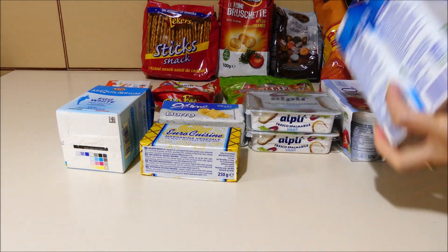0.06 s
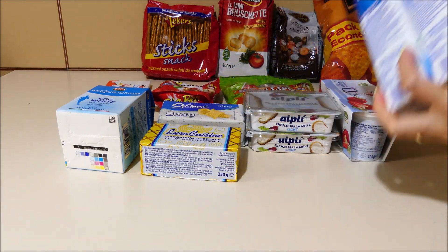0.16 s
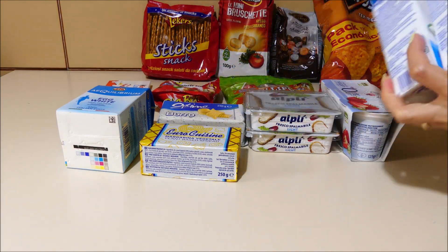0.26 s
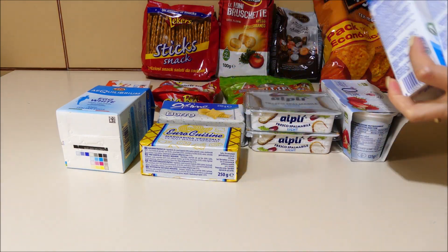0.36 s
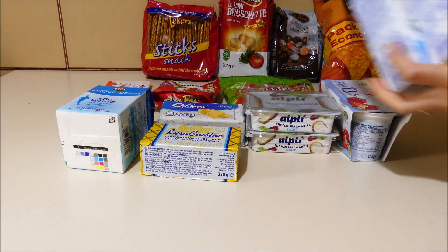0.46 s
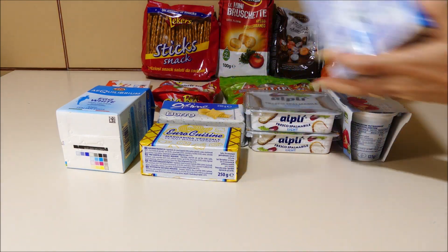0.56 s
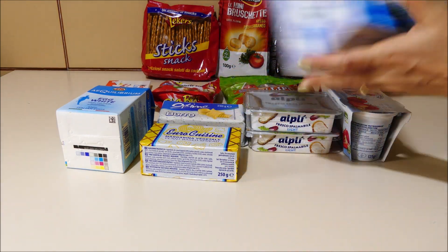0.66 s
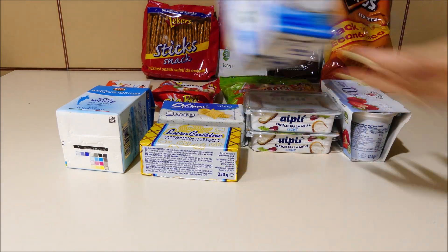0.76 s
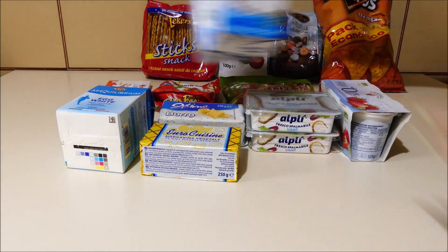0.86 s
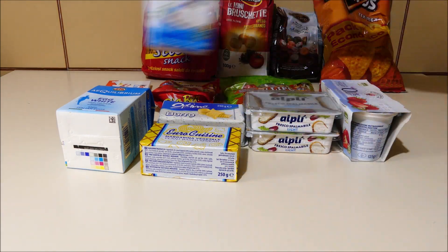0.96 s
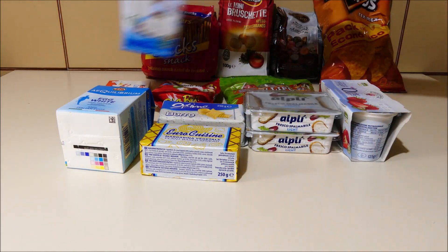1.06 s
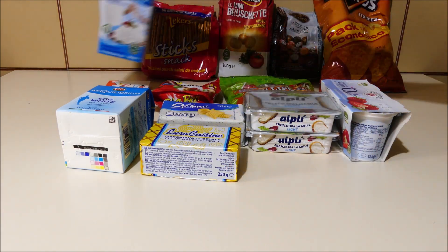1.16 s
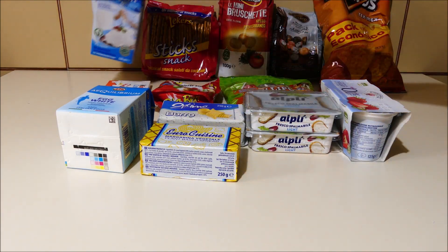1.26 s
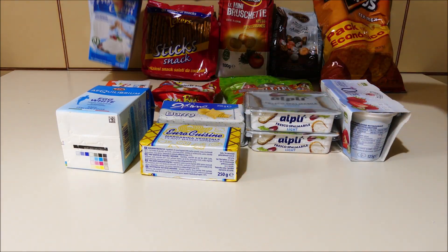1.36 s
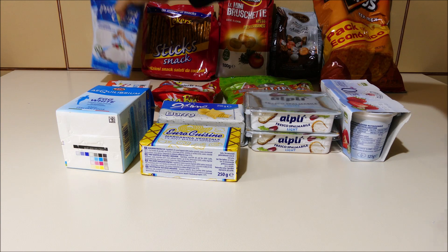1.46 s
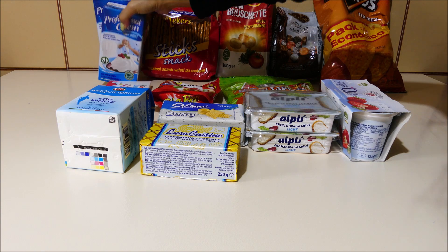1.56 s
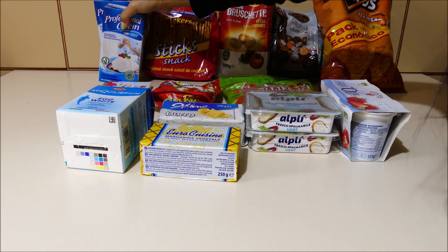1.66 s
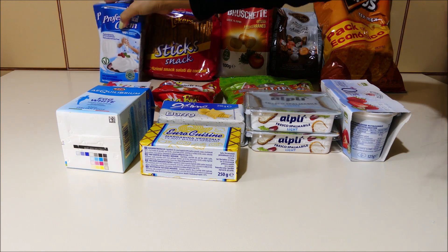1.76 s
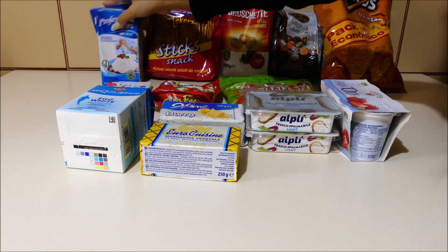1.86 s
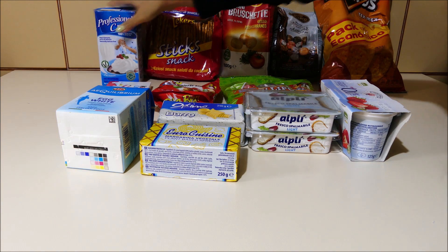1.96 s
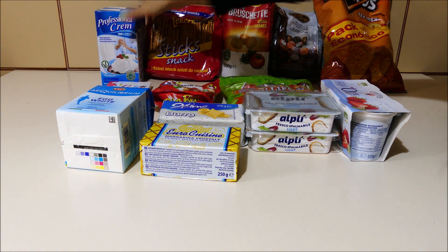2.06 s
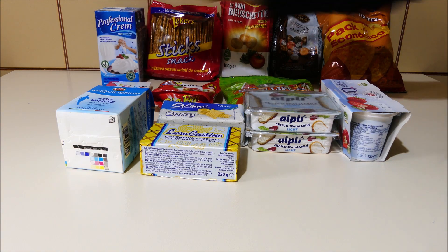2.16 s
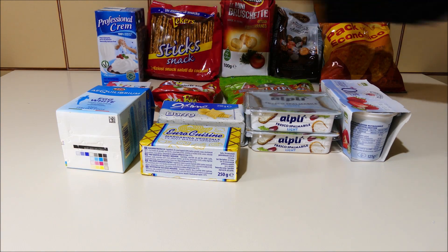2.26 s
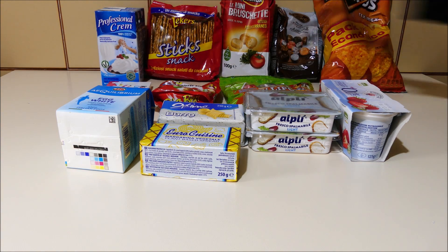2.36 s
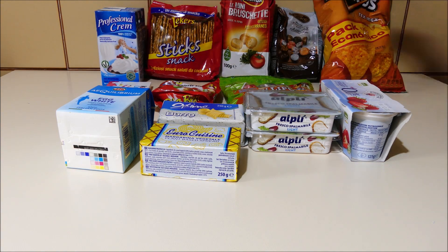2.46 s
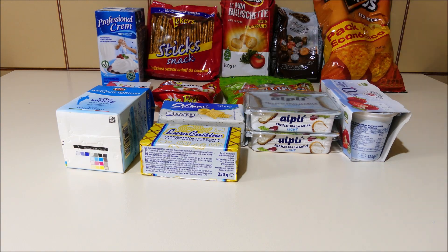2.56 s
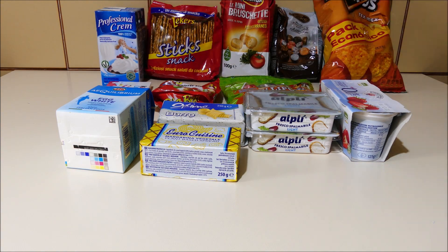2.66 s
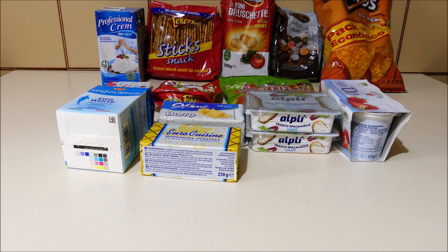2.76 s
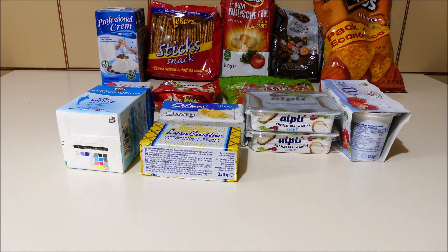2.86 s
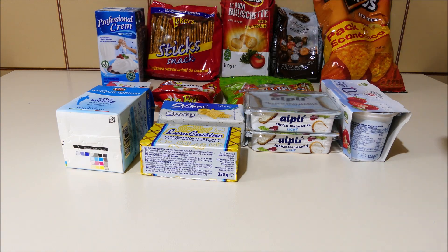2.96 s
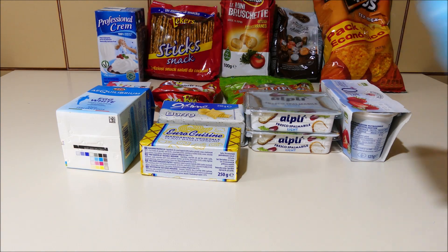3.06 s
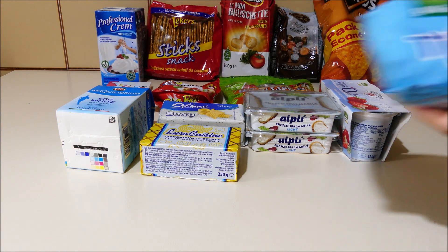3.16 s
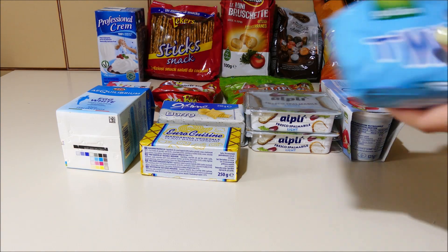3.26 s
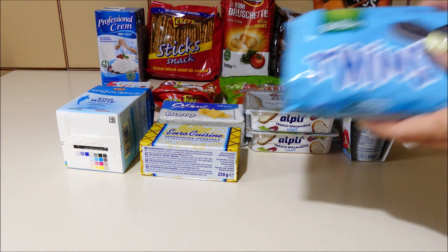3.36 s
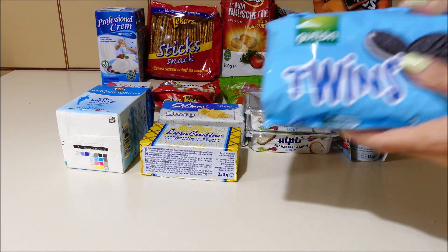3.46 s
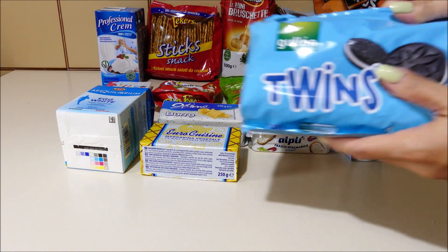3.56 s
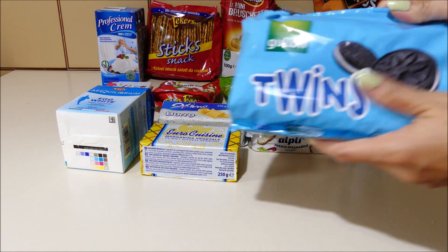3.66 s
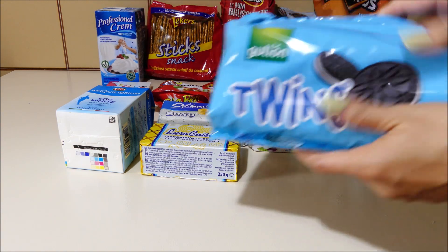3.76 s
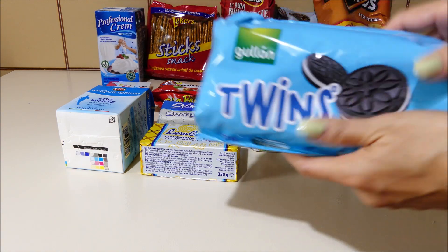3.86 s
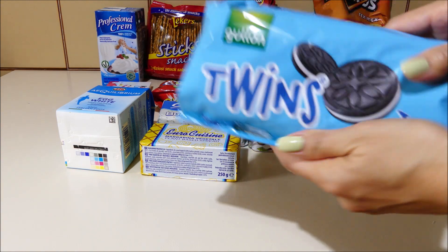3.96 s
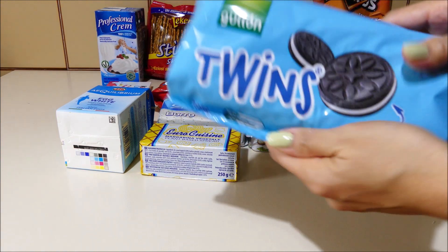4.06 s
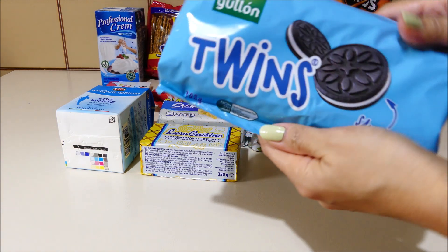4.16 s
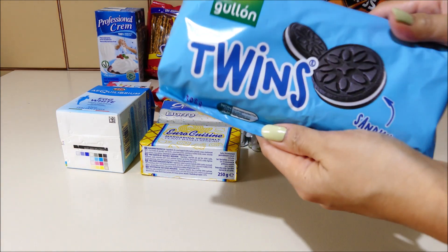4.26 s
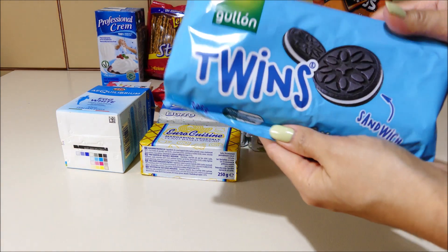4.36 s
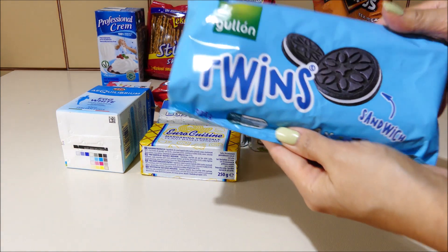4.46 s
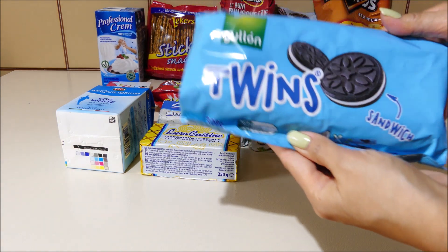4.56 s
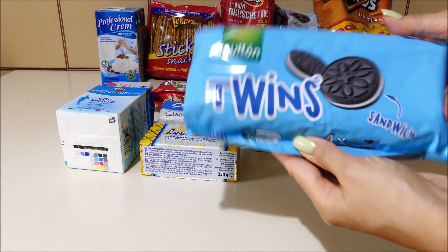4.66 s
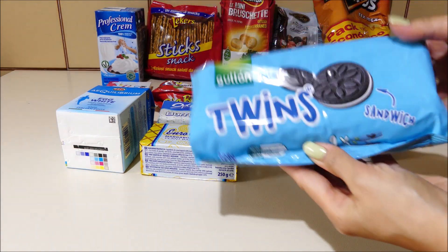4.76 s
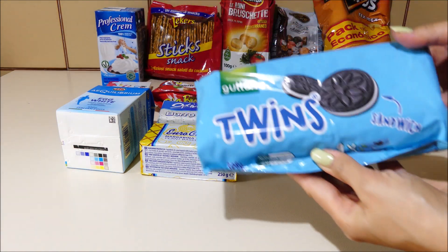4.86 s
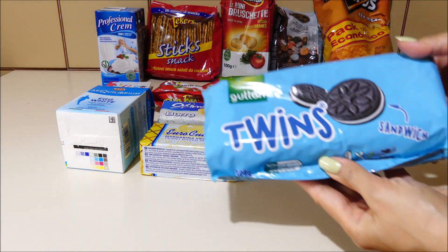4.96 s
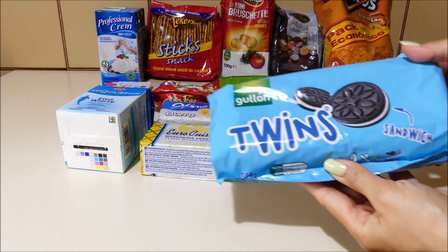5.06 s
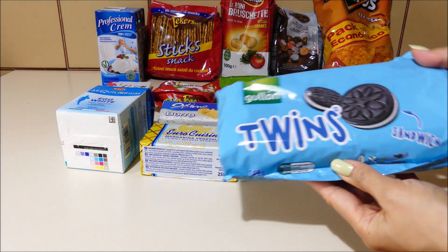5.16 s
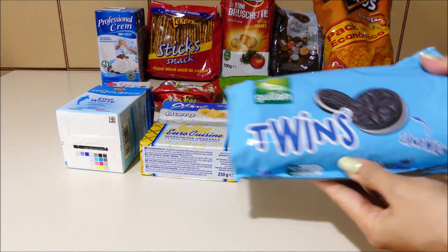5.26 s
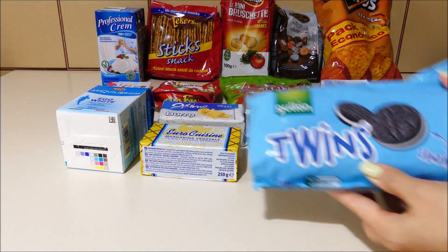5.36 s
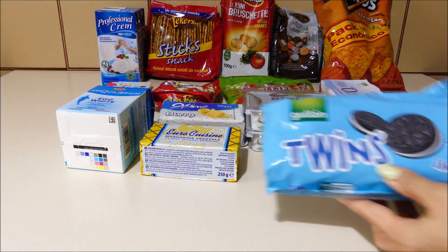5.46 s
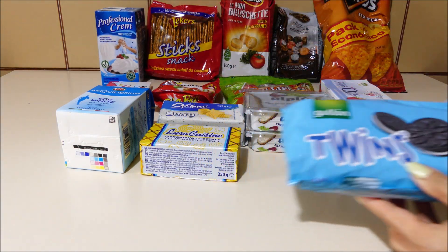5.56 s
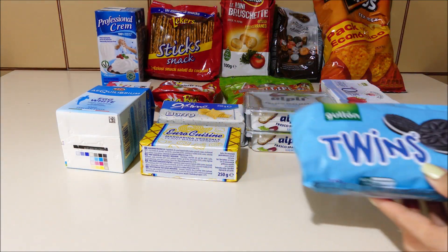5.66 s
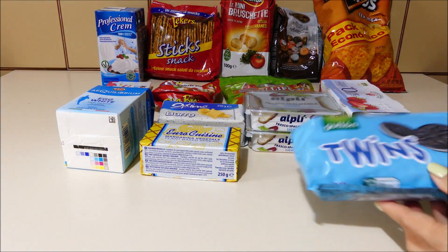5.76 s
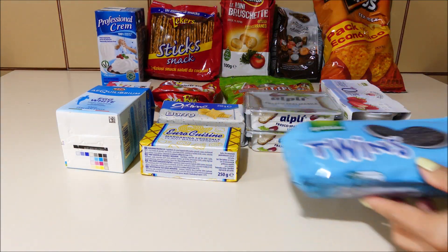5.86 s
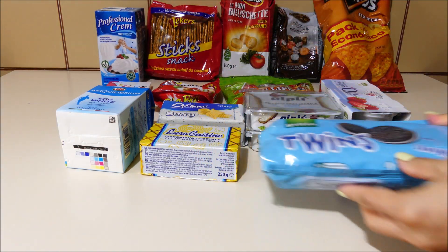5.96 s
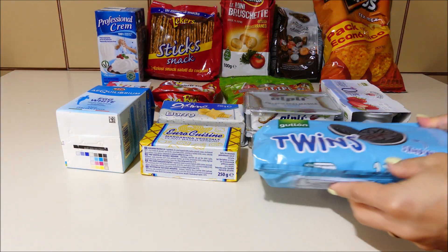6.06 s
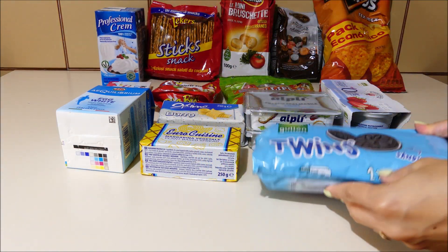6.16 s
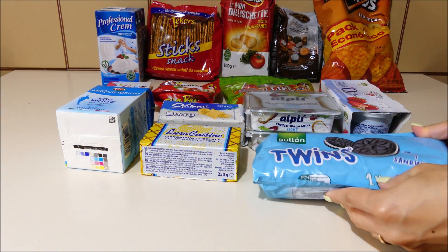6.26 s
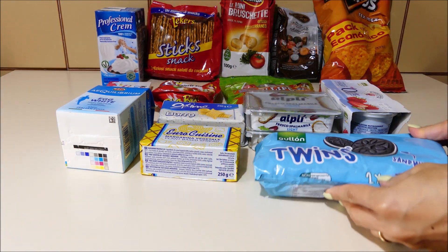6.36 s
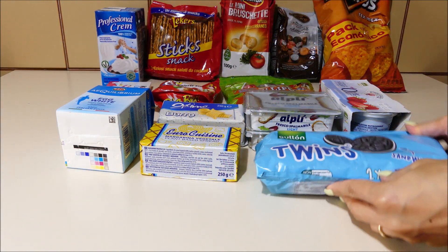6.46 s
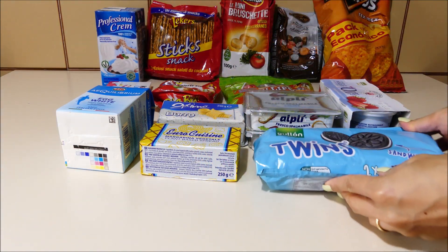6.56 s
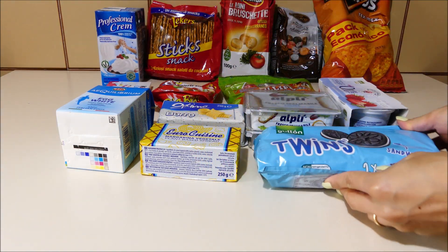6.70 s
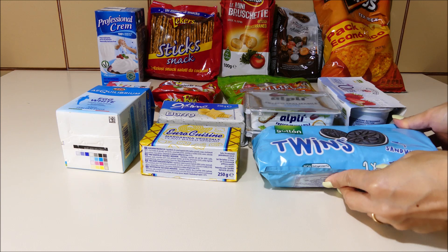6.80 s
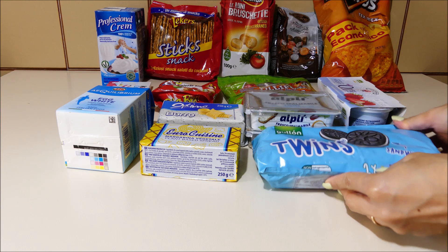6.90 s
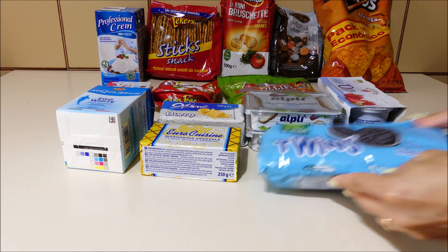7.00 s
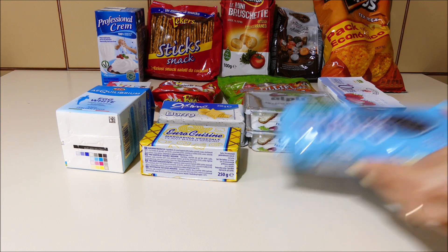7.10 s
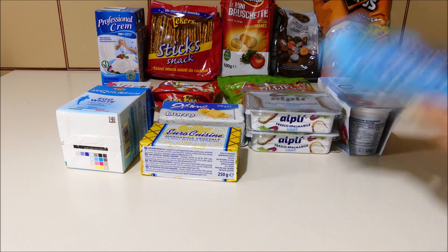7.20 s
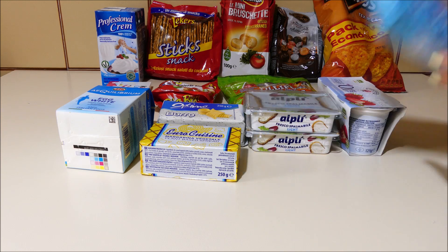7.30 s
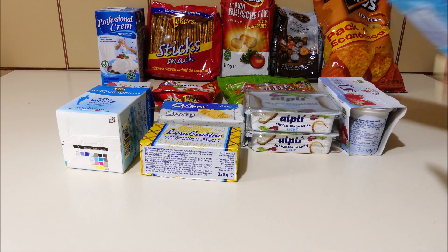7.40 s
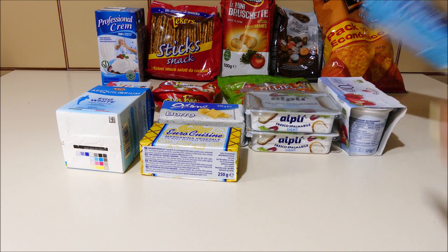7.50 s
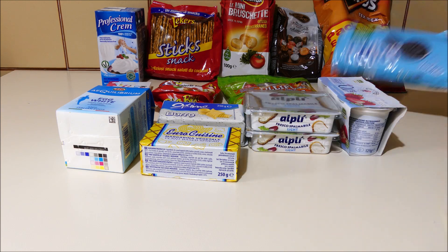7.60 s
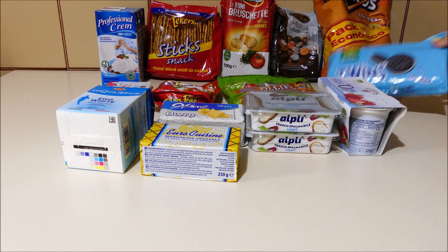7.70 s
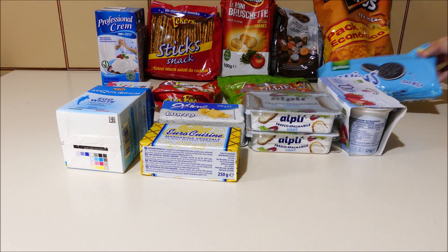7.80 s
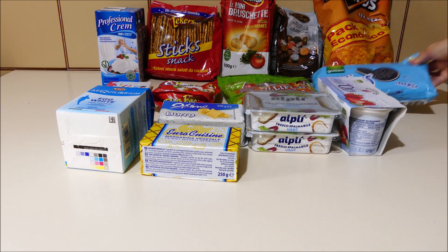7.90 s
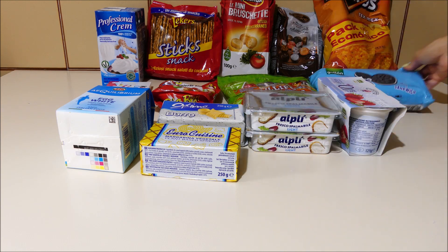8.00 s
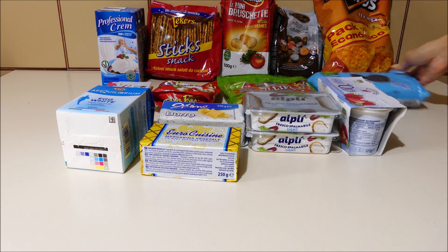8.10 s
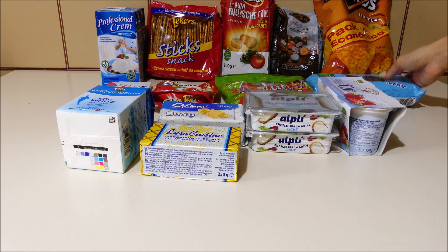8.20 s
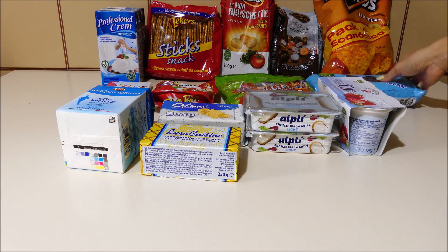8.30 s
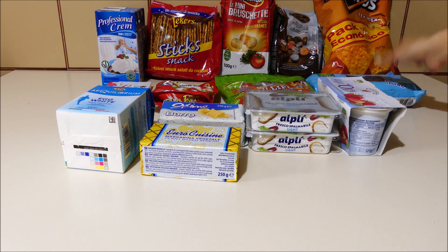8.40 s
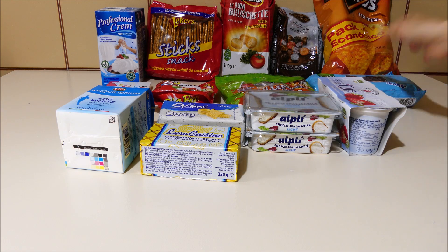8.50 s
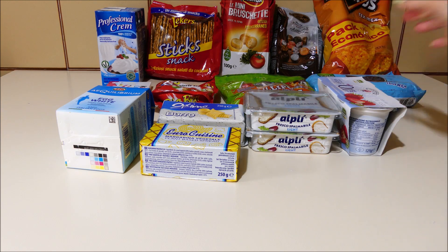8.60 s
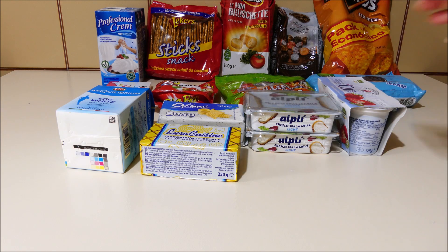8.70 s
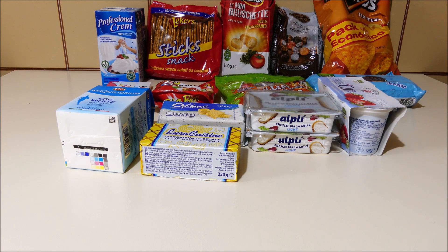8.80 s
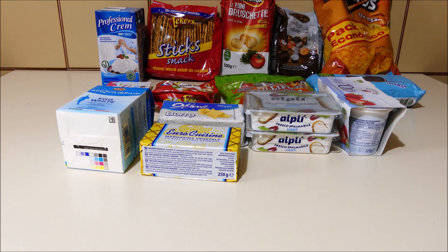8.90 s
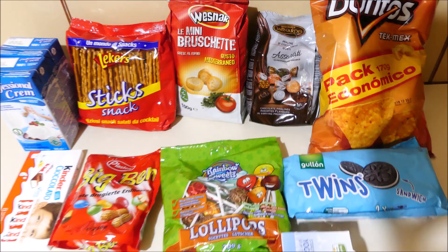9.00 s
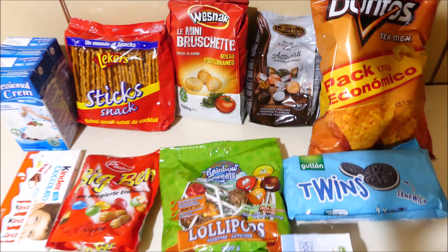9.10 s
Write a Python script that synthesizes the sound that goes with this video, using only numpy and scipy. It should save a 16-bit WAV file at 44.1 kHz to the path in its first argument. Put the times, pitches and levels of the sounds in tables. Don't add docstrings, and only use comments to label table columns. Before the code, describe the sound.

A small, hard-surfaced kitchen heard through a close microphone, with a low steady appliance hum and light hiss throughout. The first second is nearly quiet, with only barely audible brushes. From about 1.2 to 2 seconds a carton is set down with several soft, dull knocks and short papery scrapes, then it is quiet again. At about 2.8 seconds a plastic film pack is picked up; crackling swells quickly and is densest around 3.1 to 4.3, bright sharp snaps over fine crackle. From 4.5 to 5.7 it is tilted, with more separated creases and small squeezes. Near 6.2 it meets the table with a soft thud, crinkling on. It is lifted around 6.8 to 7.2, a finger stutters briefly over taut film near 7.5, and the pack is pushed among bags with a light bump at 8. Sparse last creases fade by 8.6; sound stops abruptly just after 9.

```python
import sys
import numpy as np
from scipy import signal
from scipy.fft import rfft, irfft, next_fast_len
from scipy.io import wavfile
from scipy.ndimage import uniform_filter1d, map_coordinates

SR = 44100
rng = np.random.default_rng(int(sys.argv[2]) if len(sys.argv) > 2 else 0)


def elevation(decibels):
    levels = np.asarray(decibels, float)
    return 10 ** (levels / 20)


def materialize(psi):
    bounded = np.clip(np.atleast_2d(psi).T, -1, 1)
    quanta = np.round(bounded * 32767).astype(np.int16)
    wavfile.write(sys.argv[1], SR, quanta)


N = 403074

# start_s, crack_db, ring_hz
# (facet), sizzle_db, hollow_db (both over crack)
CREASES = [(0.2055, -45, 2230, -7, -17.5), (0.2228, -43, 3540, -21, -8), (0.3685, -55, 2230.0, -12, -10),
           (0.4122, -54, 8470.0, -7.0, -1), (1.2358, -30, 4460, -9, -5), (1.2526, -41, 1440, -28, 13.5),
           (1.478, -38, 2030.0, -2, 15), (1.6448, -34.5, 1510, -4.5, 2), (1.6634, -18, 1620, -17, -4.5),
           (1.9119, -28.5, 4000, -7, 0), (1.9637, -26, 2450, -14, -3.5), (2.686, -54, 2380, -13.0, 11.5),
           (2.783, -42.5, 1500.0, -16, -1), (2.7988, -33, 1840, -13, -5.5), (2.811, -38.5, 2420, -4, -5),
          (3.007, -29.5, 1650, -15.5, -16), (3.105, -27, 1970, -20.5, -6), (3.114, -20.5, 3800, -3.5, -9.5),
          (3.1595, -21.5, 3330, -10, -11.5), (3.1845, -27, 4760.0, -14, -2),
          (3.2562, -29, 2980, -10.5, -0.5), (3.3272, -22.5, 2060, -12, -10), (3.3361, -18.5, 1570, -18, -6),
          (3.338, -18, 1530, -15, -5.5), (3.3414, -14.5, 6550, -15, -5.5), (3.3578, -21, 4760.0, -7, -11.5),
          (3.3674, -25.5, 3730.0, -6, -3), (3.4094, -27, 2720, -6, -6.5), (3.4354, -24.5, 1980, -15, -13),
          (3.532, -30.5, 8860, -19, -3), (3.543, -17, 6740, -10, -13),
           (3.5905, -25, 1750, -18, -5.5), (3.6538, -19, 8050, -24.5, -9), (3.684, -19.5, 3100, -18, -3),
         (3.7081, -26.5, 1520, -7, -3.0), (3.7402, -16.5, 6800, -18, -13), (3.749, -17.5, 5370, -3.5, -3.5),
         (3.7645, -15.5, 4420, -9, -14), (3.8671, -36, 2280, -13, 0), (3.8959, -24.5, 8300, -23, -5),
         (3.9422, -29.5, 2150, -14, -8), (3.9662, -32, 2290.0, -2.5, -5), (4.01, -25.5, 1560, -21.0, -1.5),
         (4.044, -29.5, 1500.0, -10, -6), (4.0604, -24, 2880, -18.0, -2), (4.0747, -28.5, 8700, -10, -3),
         (4.1354, -22.5, 2100, -25, -0.5), (4.1508, -30, 2750.0, -7, -4), (4.1845, -19.5, 4500, -7.5, -2.5),
         (4.274, -27.5, 2650, -17, -3.5), (4.2865, -23.5, 7240, -17, -3.5), (4.3237, -28.5, 2770, -19, -3),
           (4.4817, -22.5, 5950, -14, -14), (4.512, -29, 4540, -15, -4.5), (4.5697, -20, 8000, -17, -7.5),
          (4.5943, -21.5, 1470, -16, -2.5), (4.6224, -26, 1460, -16, 3), (4.6853, -27, 1580, -18, -5),
          (4.727, -29.0, 4740, -20, 1), (4.771, -30, 5260, -8.5, -11), (4.8578, -38, 1970, -26, -3),
          (4.9232, -28.5, 2150, -31, -7.5), (5.0012, -29, 7500, -4, -8), (5.0051, -28, 2010, -8, -7),
          (5.1053, -35, 3080, -12, -25), (5.1861, -21, 4060, -15.0, -5.5), (5.2164, -23, 1560, -19, -2),
          (5.2529, -23, 2590.0, -2, -3.5), (5.2693, -24.5, 3560, -16, -11.5), (5.343, -18, 7060, -20, -11),
          (5.3472, -21.5, 6800, -11, -17), (5.4464, -27, 4900, -5, -5), (5.5173, -29, 1970, -23, -6),
          (5.5924, -38, 4370, -7, -5), (5.645, -30.5, 1990, -18, 1.0),
           (5.7395, -23.5, 4340, -17, -7.5), (5.7905, -26.5, 9000.0, -11.5, -23),
        (5.801, -22.5, 7700, -20.5, -13.5), (5.8694, -26.5, 8900, -13, -7),
        (5.932, -38.5, 4090.0, -2.5, -8), (6.0088, -32, 7340, -13, -7), (6.017, -35, 1300, -21, 4.5),
        (6.0536, -30, 1530, -16, 0), (6.062, -32.5, 5170, -6, -4.5), (6.109, -30, 1500.0, -16.5, 0),
        (6.141, -28, 5000, -6.5, -7.5), (6.17, -18.5, 1890, -20, -6), (6.1744, -19, 2550, -14, 0),
        (6.1766, -21, 2580, -12, 4.5), (6.3955, -30, 2440.0, -24, -5), (6.4176, -24, 2500, -21, -1.5),
        (6.4286, -24, 1510, -23.0, -0.5), (6.436, -26, 6960, -18, -19), (6.4532, -25.5, 2570, -16.5, -7),
        (6.475, -26.5, 1500.0, -25, 3), (6.5259, -31.5, 3030, -12, 0.5), (6.5566, -26, 2100, -21, -0.5),
        (6.5933, -25, 6700, -28.5, -8),
           (6.726, -33.5, 1540, -25, -7), (6.7656, -25, 2180, -29, -14), (6.812, -25.5, 1580, -15, -5.5),
          (6.8818, -28, 8400, -18, -2), (6.9144, -23.5, 4260, -26, -4.5), (6.9692, -25, 2300, -8, -12),
          (6.9804, -20, 6900, -18, -3.5), (7.126, -25.5, 7730.0, -14, -11), (7.1325, -24, 7350, -12, -6.5),
          (7.174, -28, 7460, -13, -17), (7.1995, -28, 1790, -16, -6), (7.4227, -42.5, 3280, -20, -15.0),
          (7.4561, -24, 4270, -27, -10), (7.4822, -18, 2400, -33, -24), (7.4997, -20, 6570, -20, -19),
          (7.609, -32, 6400, -24, -25), (7.6815, -31, 2010, -7, 2), (7.8065, -31.5, 2440.0, -11, 1.5),
          (7.842, -25.5, 4460, -16, -1), (8.0893, -33, 1800.0, -16, 13), (8.1362, -24, 1680, -17, -1.5),
          (8.268, -29.5, 1600, -29, -5), (8.2976, -33.5, 5000, -10, -16), (8.6047, -26.5, 6500, -20, -16.5),
           (1.4933, -30, 2500, -5, 7.5),
    (7.9692, -42, 1960, -6, 17),
]


def snaps():
    creases = CREASES
    start_s, crack_db, ring_hz, sizzle_db, hollow_db = np.transpose(creases)[:, :, None]
    count = len(start_s)
    luck = rng.standard_normal((count, 2))
    flip = bursts(count, size=1024, t60=.0034 * np.exp(.3 * luck[:, :1]), rise=.0005)

    def facet(f):
        return resonance(f, ring_hz, 0.42 * ring_hz) ** 2 + elevation(-5) * resonance(f, 3390, 4100) ** 2

    crack = filtered(flip, lambda f: shiver(f, facet(f)))
    sizzle = filtered(flip, lambda f: shiver(f, resonance(f, 10400, 5400) ** 2))

    soft = elevation(np.clip(hollow_db, 0, 14))
    hollow_hz = 1100 * np.exp(.12 * luck[:, 1:]) / soft ** .2
    puff = bursts(count, size=1024, t60=0.015 * soft ** 0.39, rise=0.00059 * soft)
    hollow = filtered(puff, lambda f: shiver(f, resonance(f, hollow_hz, 1200) ** 2))

    parts = energy_one(crack)
    parts = parts + elevation(sizzle_db) * energy_one(sizzle)
    parts = parts + elevation(hollow_db) * energy_one(hollow)
    return place(start_s[:, 0] - .0003 - LEAD_S, elevation(crack_db) * parts)


# start_s, level_db, ring_hz
TICKS = [(0.214, -47, 3010), (1.6043, -41, 3450), (1.6573, -26, 10510), (1.7761, -38, 7410),
         (1.8444, -37, 1640), (1.9485, -29, 950), (2.2483, -48, 3700), (2.2712, -48, 950),
         (2.8467, -36.5, 3100), (2.9065, -35, 1890), (2.9281, -35, 8700), (2.9322, -33.5, 7840),
         (2.985, -40, 8350), (3.0172, -34, 3010), (3.0235, -38, 7840), (3.08, -32, 3270),
         (3.0911, -29, 3190), (3.1566, -27, 2150), (3.2072, -31, 1720), (3.2161, -24, 7840),
         (3.2314, -33, 6800), (3.2653, -28, 1380), (3.402, -22, 3100), (3.4098, -22.5, 2840),
         (3.424, -27.5, 3880), (3.5102, -32, 3270), (3.55, -22, 7060), (3.6759, -21, 8870),
         (3.6795, -25, 8010), (3.6956, -22, 4050), (3.7249, -27, 3270), (3.7561, -19, 1460),
         (3.8129, -31, 1890), (3.8333, -31, 1640), (3.8433, -33, 7750), (3.8925, -31, 4390),
         (3.8997, -27, 3360), (3.924, -30, 3700), (3.9415, -27, 3270), (3.9623, -28, 1210),
         (3.9887, -28, 1550), (4.0148, -19, 7150), (4.032, -26, 7920), (4.1138, -36, 2070),
         (4.1516, -19, 2670), (4.1936, -27, 4390), (4.2539, -34, 1890), (4.2573, -33, 2670),
         (4.3853, -39, 2070), (4.4176, -42, 2840),
         (4.4444, -44, 4220), (4.5743, -27, 8050), (4.5845, -26, 1810), (4.6229, -20, 7670),
                (4.6725, -30, 7670), (4.6954, -27, 8100), (4.7008, -26.5, 4740), (4.8573, -27, 1880),
                (4.9288, -36, 4910), (4.963, -32, 1820), (5.034, -33, 7320), (5.0576, -32, 1890),
                (5.065, -37, 12400), (5.0875, -35, 12580), (5.1057, -24, 3190), (5.1238, -27, 11020),
                (5.1387, -28, 2070), (5.1467, -26, 8010), (5.2061, -21, 7850), (5.2258, -27, 7490),
                (5.2487, -28, 1720), (5.2911, -28, 5430), (5.3488, -16, 7100), (5.4406, -30, 1470),
                (5.4639, -37, 4820), (5.5385, -39, 1980), (5.556, -40, 1890), (5.6117, -40, 1380),
                (5.6163, -42, 5080), (5.6276, -40, 1210), (5.641, -30, 5300), (5.7348, -32, 3270),
                (5.746, -31, 1810), (5.785, -35, 3360), (5.8691, -19, 10340), (5.9698, -42, 9820),
                (5.999, -41.5, 2760), (6.0088, -27, 7600), (6.0174, -22.5, 1380), (6.0963, -28, 7600),
                (6.1187, -28, 2070), (6.1317, -25, 950), (6.3318, -33.5, 2410), (6.359, -37, 2070),
                (6.372, -31, 2090), (6.407, -30, 2840), (6.521, -34, 2070), (6.5344, -29, 1290),
                (6.573, -32, 1460), (6.5926, -17, 7130),
         (6.6061, -32, 7670), (6.6213, -29, 4030), (6.6655, -32, 6980), (6.6703, -35, 2150),
              (6.6879, -34, 8010), (6.6984, -34, 2150), (6.7063, -38, 3620), (6.7173, -36, 2760),
              (6.7301, -36, 6720), (6.806, -27, 5300), (6.834, -25, 11460), (6.9, -28, 2600),
              (6.9064, -25, 1290), (6.9365, -28, 1550), (6.9759, -21, 3360), (7.0275, -26, 1640),
              (7.0693, -28, 1810), (7.1013, -24, 1380), (7.1095, -31, 7410), (7.1274, -17, 7580),
              (7.154, -23, 7060), (7.1933, -28, 4770), (7.291, -38, 7750), (7.2977, -33, 8200),
              (7.4349, -47, 3270), (7.576, -26, 6890), (7.581, -29, 7320), (7.5868, -30, 7150),
              (7.5941, -30, 7240), (7.6158, -32, 7300), (7.6219, -32, 7150), (7.6301, -35, 7320),
              (7.6417, -33, 8010), (7.6668, -34, 3220), (7.7285, -37, 7320), (7.782, -28, 4740),
              (7.8662, -30, 3880), (7.8707, -31, 6890), (7.9092, -29, 3360), (7.9541, -26, 2670),
              (7.9596, -32, 7580), (7.9761, -25, 7580), (8.0054, -23, 10420), (8.0131, -26, 7580),
              (8.0367, -24, 2070), (8.0827, -22, 1460), (8.1163, -28, 2070), (8.2585, -34, 7670),
              (8.2984, -31, 4900), (8.8807, -56, 950)]


def ticks():
    start_s, level_db, ring_hz = np.transpose(TICKS)[:, :, None]
    flick = bursts(count=len(start_s), size=512, t60=0.0021, rise=0.0003)

    def facet(f):
        ring = resonance(f, ring_hz, 0.18 * ring_hz + 500) ** 2
        lower_ring = elevation(-2.5) * resonance(f, 0.6 * ring_hz, 0.26 * ring_hz) ** 2
        edge = elevation(-18) * resonance(f, 5000, 9000)
        return ring - lower_ring + edge

    sound = energy_one(filtered(flick, lambda f: shiver(f, facet(f))))
    return place(start_s[:, 0] - LEAD_S, elevation(level_db - 3.0) * sound)


# peak_s, fade_s (for 20 dB), crackle_db, rub_db (over crackle)
BRUSHES = [(.215, 0.1, -49.5, -2), (.42, 0.2, -49, -3), (1.5, 0.0949, -31, 0), (1.68, 0.08, -35.5, -2.5),
           (1.82, 0.31, -43, 4), (1.96, 0.09, -40, 4), (2.26, 0.35, -56.5, 1), (2.7, 0.08, -68, 21),
           (2.8, 0.16, -42, -10.5), (3.752, .04, -27, -8), (6.981, .07, -24, -5), (7.49, 0.37, -36, -7.5)]
# peak_s, fade_s (for 20 dB), crackle_db, rub_db (over crackle)
SQUEEZES = [(2.91, 0.05, -37, -7), (3.13, 0.16, -29.5, -8), (3.38, .25, -35.5, -11.5),
            (3.6, 0.21, -35.5, -4), (3.76, 0.14, -39.5, 1.5), (3.95, 0.22, -32.5, -8),
            (4.3, 0.15, -37, -5.5), (4.62, 0.0844, -27, -9), (4.95, 0.47, -48, 0), (5.06, 0.18, -40.5, -10),
            (5.16, 0.1038, -28.5, -9.5), (5.4, 0.46, -41.5, -8), (5.85, 0.1, -34.5, -16.5),
            (6.11, 0.08, -33, -12.5), (6.21, 0.15, -35.5, -2), (6.44, 0.24, -47.5, 7),
            (6.6, 0.17, -34.5, -8), (6.85, 0.13, -32.5, -13), (7.13, 0.19, -28.5, -14),
            (7.57, 0.08, -36, -11.5), (7.68, 0.07, -43, -3), (7.85, .14, -32, -7), (8.05, 0.1449, -26, -8),
            (8.22, 0.2, -43, -10.5)]
BRUSH_RISE, SQUEEZE_RISE = .15, 0.92
# freq_hz, level_db (per Hz)
FILM = [(700, -32.5), (1200, -10.5), (5000, -5.5), (7600, -1.5), (10000, -8), (14600, -9)]
# freq_hz, level_db (per Hz)
RUB = [(90, -18), (200, -19.5), (800, -8.5), (1400, -11), (3500, -18.5), (7000, -60)]


def handling():
    brushing, squeezing = effort(BRUSHES, BRUSH_RISE), effort(SQUEEZES, SQUEEZE_RISE)
    crackle_gain, rub_gain = np.hypot(brushing, squeezing)
    crackle = grains(count=22000, centre_hz=5200, cycles=8.5, spread_db=2.0, clump_db=4.5, spectrum=FILM)
    rub = grains(count=10000, centre_hz=990, cycles=5.4, spread_db=2.0, clump_db=3.5, spectrum=RUB)
    return crackle_gain * crackle + rub_gain * rub


def effort(rows, rise):
    peak_s, fade_s, crackle_db, rub_db = np.transpose(rows)[:, :, None]
    late = (np.arange(0, N, 100) / SR - peak_s) / np.abs(fade_s)
    fall_db = 20 * np.where(late > 0, late, -late / rise)
    power = elevation(crackle_db - fall_db) ** 2
    both = [power.sum(axis=0), (power * elevation(rub_db) ** 2).sum(axis=0)]
    return np.sqrt(both).repeat(100, axis=1)[:, :N]


def grains(count, centre_hz, cycles, spread_db, clump_db, spectrum):
    when, size = rng.random((2, count))
    hz = np.clip(centre_hz * np.exp(0.55 * rng.standard_normal((count, 1))), 100, SR / 2.5)
    t = np.arange(160) / SR
    slips = np.sin(2 * np.pi * hz * t) * np.minimum(t * hz, 1) * elevation(-60 * t * hz / cycles)
    clumps = map_coordinates(rng.standard_normal(N // 400), [when * (N // 400 - 1)])
    gain = elevation(np.minimum(-spread_db * np.log(size) + clump_db * clumps, 10))

    def colour(f):
        flatten = np.hypot(f / centre_hz, centre_hz / (f + 50))
        return elevation(along(spectrum, f)) * flatten

    stream = filtered(place(when * N / SR, gain[:, None] * slips), colour)
    slow_power = np.abs(uniform_filter1d(stream ** 2, size=3000))
    return stream / np.sqrt(slow_power + 1e-9)


# start_s, end_s, first_slips_per_s, last_slips_per_s, level_db
SLIDE = (7.518, 7.574, 700, 269, -32.5)


def slide():
    start_s, end_s, first_rate, last_rate, level_db = SLIDE
    t = np.arange(N) / SR
    on = (t > start_s) & (t < end_s)
    turns = np.cumsum(on * np.interp(t, [start_s, end_s], [first_rate, last_rate])) / SR
    slips = np.diff(np.floor(turns), prepend=0) * elevation(2.5 * rng.standard_normal(N))

    def film(f):
        return resonance(f, 7100, 2200) ** 2 - elevation(-8) * resonance(f, 4500, 1800) ** 2

    sound = filtered(slips, film)
    return elevation(level_db) * sound / np.std(sound[on])


# start_s, peak_db, thud_hz
KNOCKS = [(1.478, -30, 89), (1.794, -29.5, 145), (1.936, -32.5, 170), (1.912, -34, 560), (1.96, -33, 620),
          (1.99, -37, 118), (1.25, -43, 250), (6.172, -37, 110), (6.98, -34, 450), (7.97, -39, 99),
          (5.15, -39.5, 230), (2.74, -45.5, 160), (3.336, -34, 300), (4.175, -34, 230), (6.169, -25.5, 540),
          (7.965, -34.5, 327)]


def knocks():
    start_s, peak_db, thud_hz = np.transpose(KNOCKS)[:, :, None]
    push = bursts(count=len(start_s), size=2048, t60=0.024, rise=0.0015)
    thud = filtered(push, lambda f: resonance(f, thud_hz, 0.52 * thud_hz) * resonance(f, 120, 640))
    return place(start_s[:, 0], elevation(peak_db + 4.5) * energy_one(thud))


# freq_hz, t60_s
ROOM = [(150, 0.42), (1400, 0.35), (5000, 0.37), (14000, 0.38)]


def room(x):
    wet, step = np.zeros(N + SR), SR // 12
    build = 1 - np.exp(-np.arange(SR // 2) / SR / 0.00068)
    for start in range(0, N, step):
        hz, t, z = signal.stft(rng.standard_normal(SR // 2), SR, nperseg=256)
        decay = elevation(-60 * t / along(ROOM, hz)[:, None])
        tail = signal.istft(z * decay, SR, nperseg=256)[1][:SR // 2] * build
        piece = signal.fftconvolve(x[start:start + step], tail / np.linalg.norm(tail))
        wet[start + 60:][:len(piece)] += piece
    return filtered(wet[:N], lambda f: 1 / np.hypot(1, (f / 7000) ** 0.5))


# freq_hz, level_db (per Hz)
AIR = [(20, -40.5), (70, -15.5), (140, -22.5), (500, -23.5), (1300, -30.5), (3000, -34), (9000, -37.5),
       (16000, -35.5)]
# pitch_hz, width_hz, level_db (rms)
HUM = [
    (48.9, 4.1, -50.5),
    (229, 38, -60.5),
    (784, 15, -73),
    (2330, 90, -72),
]


def background():
    air = elevation(-55.5) * unit(filtered(rng.standard_normal(N), lambda f: elevation(along(AIR, f))))
    mains_hz, _, mains_db = HUM[0]
    steady = np.sin(2 * np.pi * mains_hz * np.arange(N) / SR) * elevation(mains_db)
    fuzzy = []
    for hz, width, db in HUM:
        tone = filtered(rng.standard_normal(N), lambda f: resonance(f, hz, width) ** 2)
        fuzzy.append(elevation(db) * unit(tone))
    return air + steady + fuzzy[0] / 4 + sum(fuzzy[1:])


def unit(x):
    return x / np.sqrt(np.mean(x ** 2) + 1e-20)


def energy_one(rows):
    return rows * np.sqrt(200 / np.sum(rows ** 2, axis=1, keepdims=True))


def along(points, hz):
    f, v = np.transpose(points)
    return np.interp(np.log(hz + 1), np.log(f + 1), v)


def filtered(x, response):
    m = next_fast_len(x.shape[-1] + 4096)
    spectrum = rfft(x, m) * response(np.fft.rfftfreq(m, 1 / SR))
    return irfft(spectrum, m)[..., :x.shape[-1]]


def resonance(f, centre_hz, width_hz):
    return 1j * f * width_hz / (centre_hz ** 2 - f * f + 1j * f * width_hz + 1e-9)


LEAD_S = .0015


def shiver(f, response):
    return np.abs(response) * np.exp(-2j * np.pi * f * LEAD_S)


def bursts(count, size, t60, rise):
    t = np.arange(size) / SR
    envelope = (1 - np.exp(-t / rise)) * elevation(-60 * t / t60)
    z = rfft(rng.standard_normal((count, size)) * envelope)
    return irfft(z / uniform_filter1d(np.abs(z), size=7) ** .8, size)


def place(times, sounds):
    at = np.round(times * SR).astype(int)[:, None] + np.arange(sounds.shape[1])
    return np.bincount(at.ravel(), sounds.ravel(), N + SR)[:N]


# start_s, end_s
CLOSE = (3.0, 7.7)


def scene():
    near = snaps() + knocks() + handling() + slide() + ticks()
    t = np.arange(N) / SR
    held_close = (t > CLOSE[0]) & (t < CLOSE[1])
    sent = near * np.where(held_close, elevation(-5.5), elevation(-1.5))
    mono = near + room(sent) + background()
    return np.array([mono, mono])


def starved(x):
    hz, t, z = signal.stft(x, SR, nperseg=1024)
    busy = np.mean(np.abs(z) ** 2, axis=0) > elevation(-150)
    band = rng.random((len(hz) // 5 + 1, len(t) // 2 + 1)).repeat(5, axis=0).repeat(2, axis=1)
    chance = np.clip(hz / 45000 - .12, 0, 1)[:, None]
    empty = busy & (band[:len(hz), :len(t)] < chance)
    return signal.istft(z * ~empty, nperseg=1024)[1][:N]


def side_grain(mid):
    hz, t, z = signal.stft(mid, SR, nperseg=2048)
    quiet = np.mean(np.abs(z[40:]) ** 2, axis=0) < elevation(-160)
    whole_frame = rng.random(len(t)) < .2
    band = rng.random((len(hz) // 20 + 1, len(t))).repeat(20, axis=0)[:len(hz)]
    apart = band < np.where(quiet | whole_frame, .8, .1)
    noise = signal.stft(rng.standard_normal(N), nperseg=2048)[2]
    noise = noise / np.sqrt(np.mean(np.abs(noise) ** 2))
    level = np.sqrt(np.abs(uniform_filter1d(np.abs(z) ** 2, size=20, axis=0)))
    level = level * elevation(along([(250, -14), (1000, -20), (12000, -9)], hz))[:, None]
    return signal.istft(apart * level * noise, nperseg=2048)[1][:N]


def low_pass(x):
    return signal.sosfilt(signal.butter(12, 16950, fs=SR, output="sos"), x)


CUT_S = 9.0225


def record(dry):
    def notch(f):
        return 1 - .85 * resonance(f, 5930, 200) - .25 * resonance(f, 5900, 1200)

    def limit(f):
        return elevation(np.interp(f, [10, 30, 15750, 16050, 17000], [-30, 0, 0, -36, -60]))

    rounded = dry[0] / (1 + np.abs(dry[0]) ** 6) ** (1 / 6)
    mid = filtered(starved(rounded), lambda f: notch(f) * limit(f))
    side = side_grain(mid)
    mix = .97 * (mid + np.array([side, -side])) * (np.arange(N) < CUT_S * SR)
    return low_pass(mix)


dry = scene()
out = record(dry)
materialize(out)
```